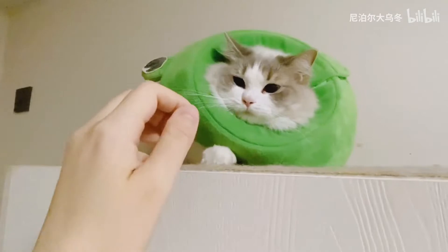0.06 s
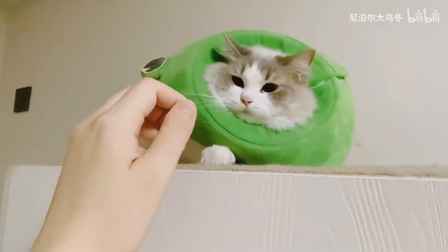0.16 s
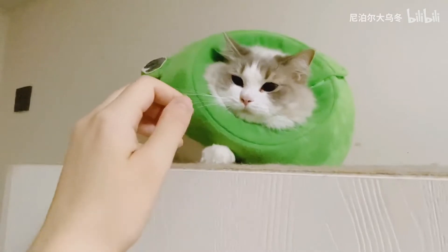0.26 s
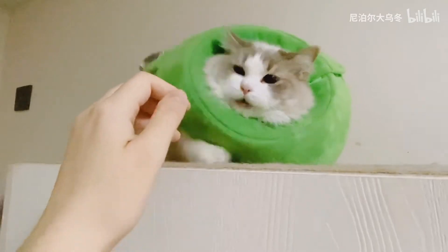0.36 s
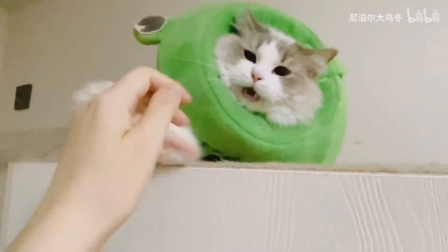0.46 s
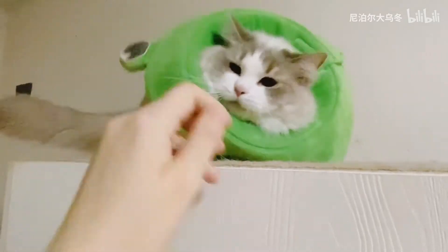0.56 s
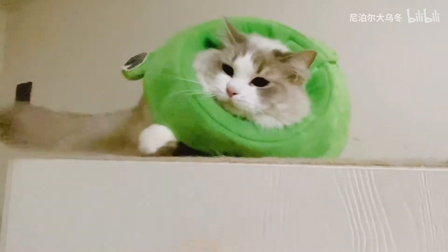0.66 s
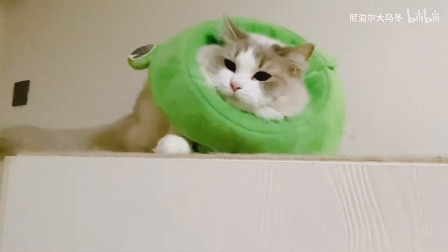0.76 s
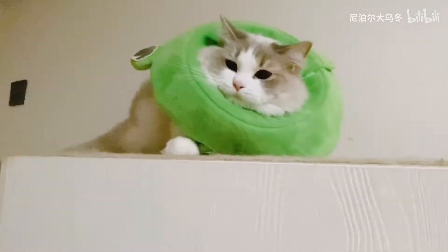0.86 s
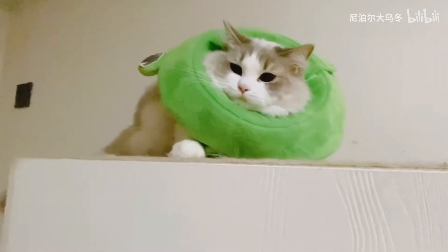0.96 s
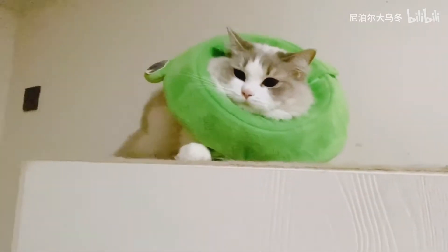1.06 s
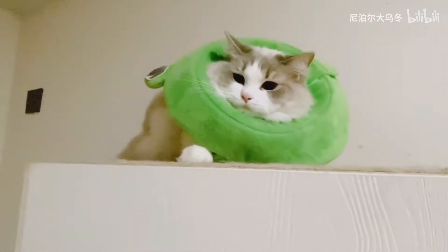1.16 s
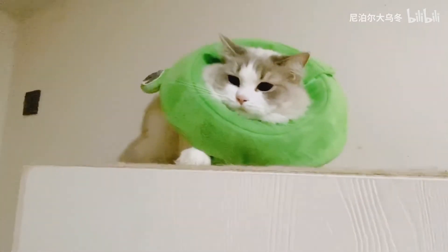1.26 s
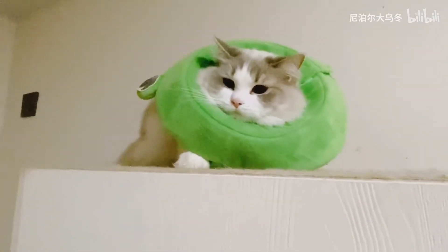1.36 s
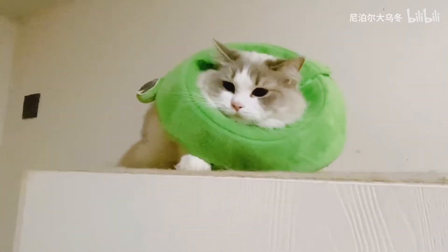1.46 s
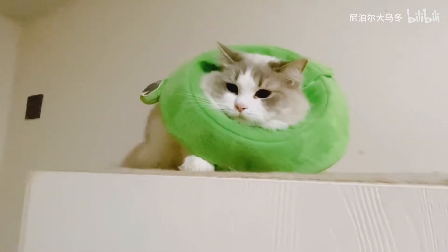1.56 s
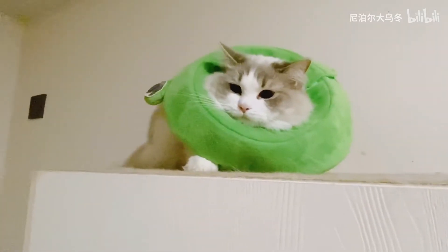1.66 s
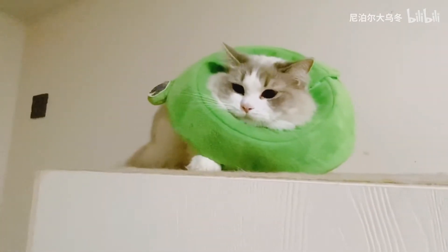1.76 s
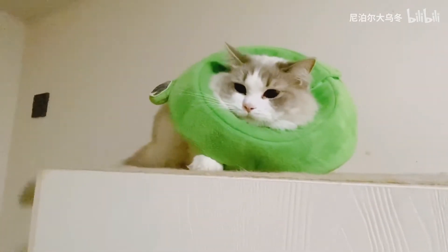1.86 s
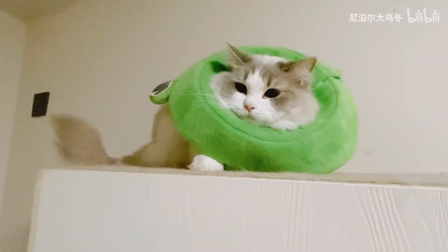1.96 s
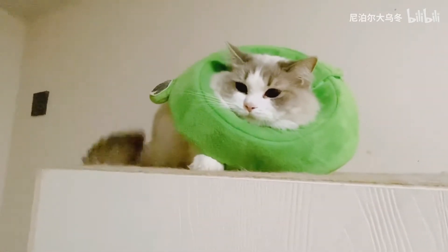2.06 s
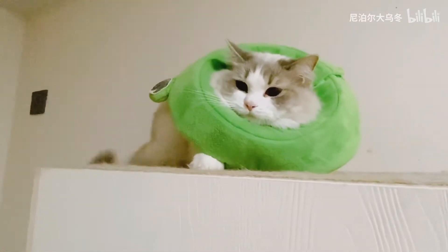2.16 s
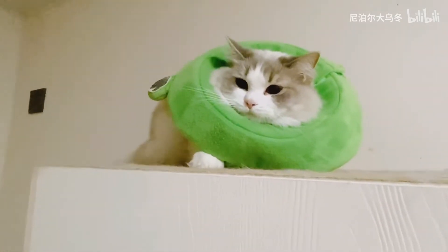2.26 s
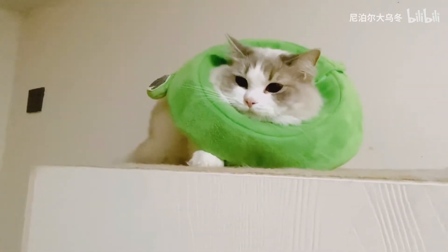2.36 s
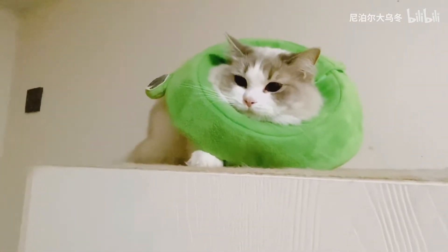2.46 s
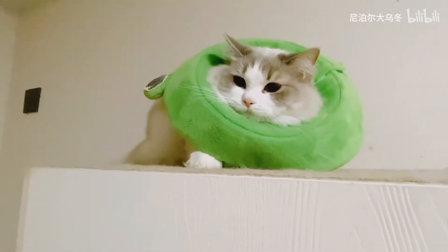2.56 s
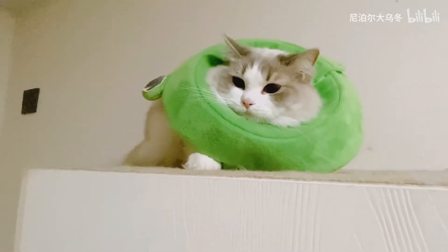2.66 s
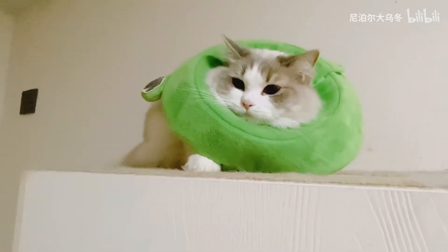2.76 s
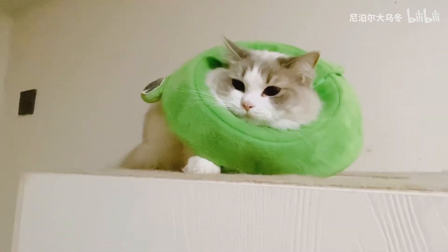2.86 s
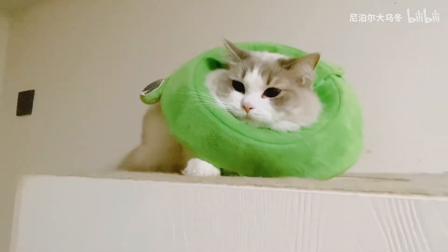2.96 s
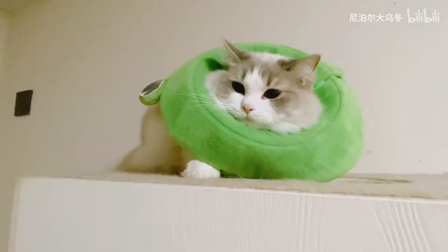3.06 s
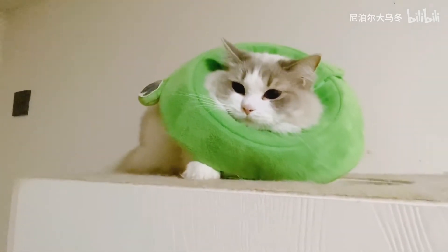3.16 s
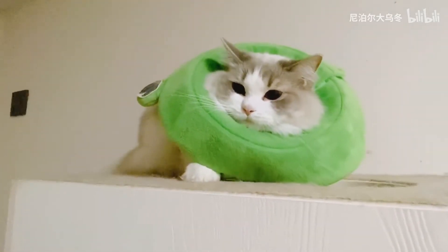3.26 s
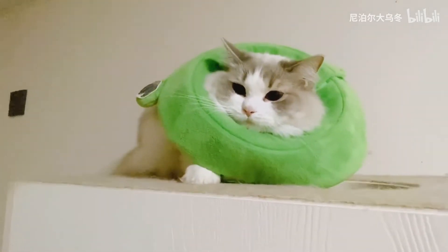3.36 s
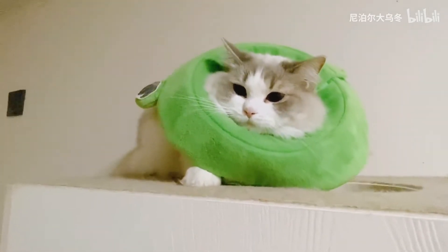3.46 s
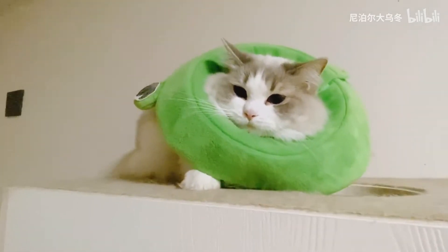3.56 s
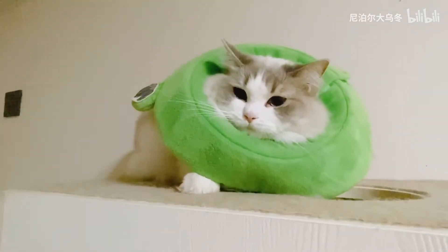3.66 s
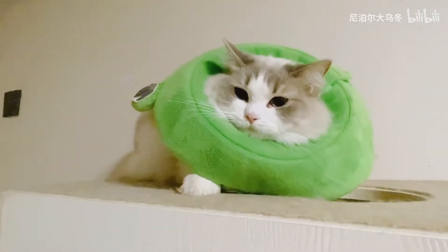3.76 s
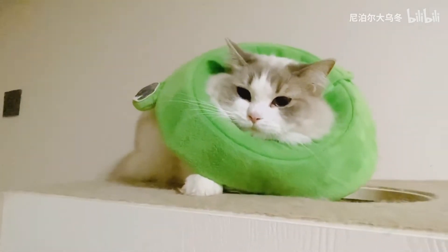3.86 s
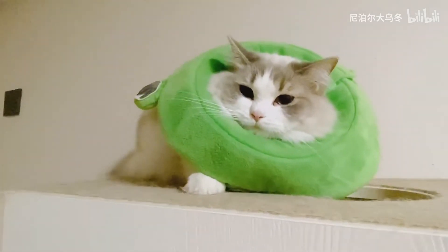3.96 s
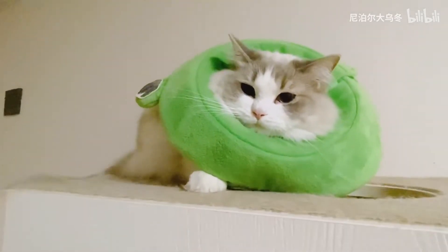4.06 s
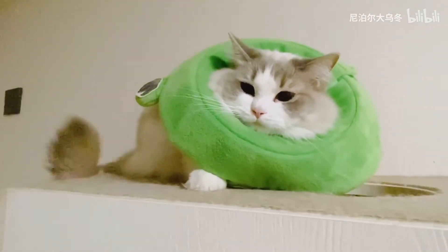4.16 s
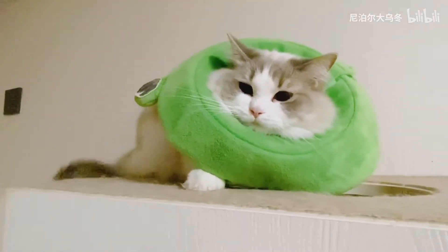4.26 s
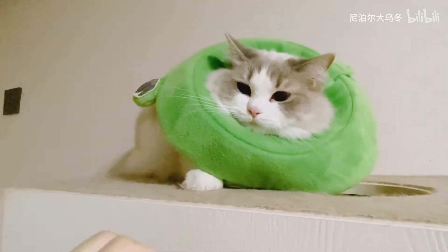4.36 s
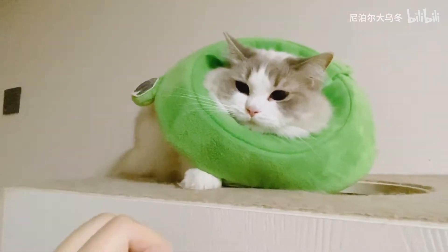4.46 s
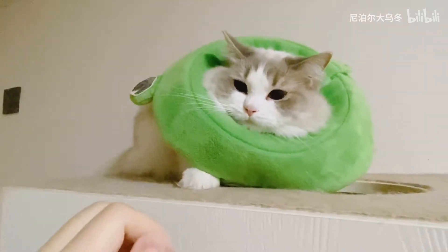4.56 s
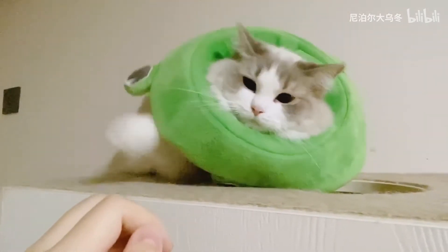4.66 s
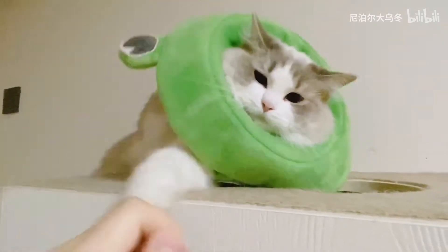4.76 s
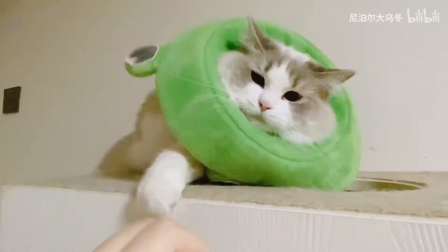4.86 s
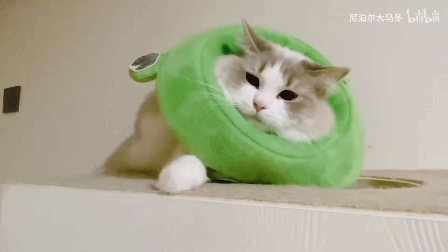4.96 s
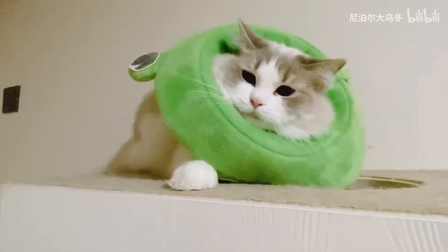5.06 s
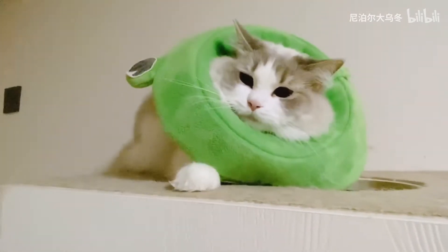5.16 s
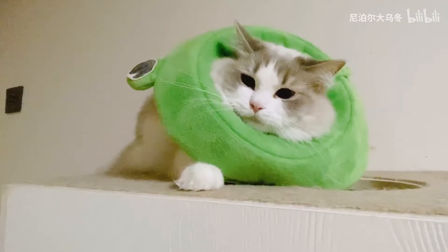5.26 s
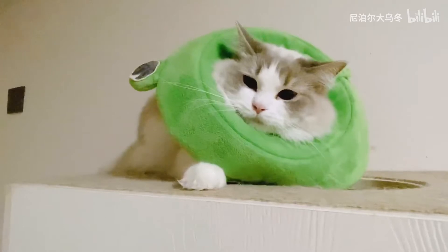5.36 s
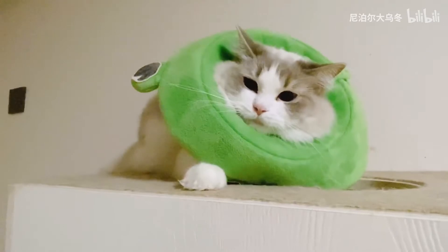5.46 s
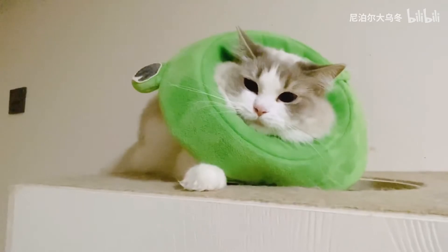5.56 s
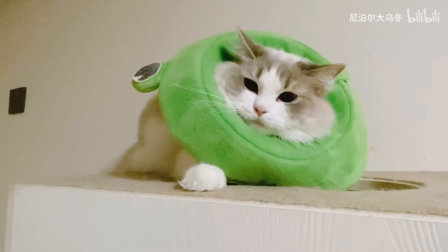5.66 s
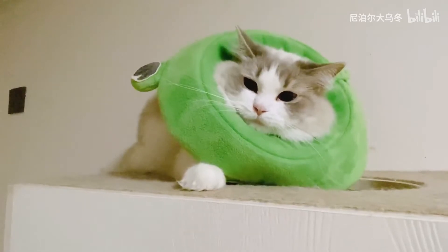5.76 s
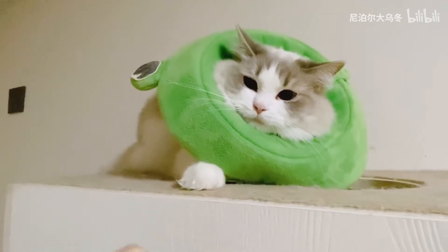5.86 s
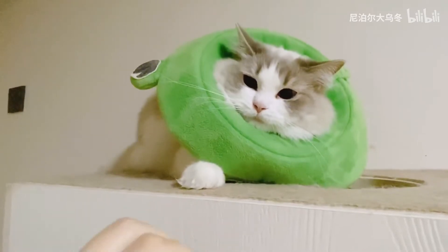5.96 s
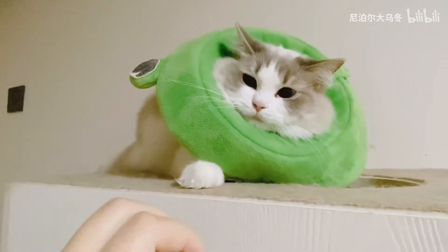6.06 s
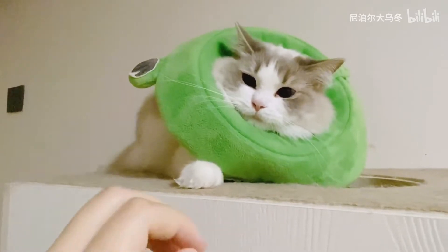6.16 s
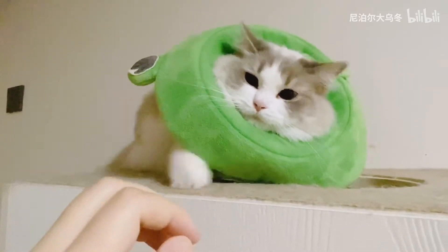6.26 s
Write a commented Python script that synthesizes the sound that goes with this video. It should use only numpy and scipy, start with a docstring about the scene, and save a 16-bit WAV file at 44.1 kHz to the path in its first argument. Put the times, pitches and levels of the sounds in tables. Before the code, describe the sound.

An angry cat close to the microphone in a small room. A very short, piercing screech with spitting air and soft paw thumps comes first, then a faint low grunt and a long closed-mouth moan that rises, holds and sinks into a growl. After a pause, a paw slams the wooden cupboard top and a loud, rasping, wavering yowl follows. Quiet rumble and faint hiss lie beneath.

```python
"""On top of a cupboard in a small room, an angry cat cries close by and swipes at a hand.
It screeches, grunts, then moans through a shut mouth, sinking into a growl; a paw slams on the board
and a louder, rasping yowl follows. The voice is a stack of overtones shaped by throat and jaw, with
hissing air on top. Paw pushes ring the board; claws, fur and faint puffs are short noises. Soft echoes,
a low rumble, a hum that swells twice and a faint hiss lie around it all."""
import sys
import numpy as np
from scipy import signal
from scipy.fft import rfft, irfft
from scipy.io import wavfile

SR = 44100
rng = np.random.default_rng(int(sys.argv[2]) if len(sys.argv) > 2 else 0)


def master(y):
    """Save y as 16-bit WAV."""
    cut = np.clip(np.atleast_2d(y).T, -1, 1)
    pcm = np.round(cut * 32767)  # scale
    wavfile.write(sys.argv[1], SR, pcm.astype(np.int16))


N = 278094
TIME = np.arange(N) / SR   # seconds

# the tune of each cry, before waver and catches: time_s, pitch_hz
SCREECH_PITCH = [(0.394, 745.6), (0.411, 754.6), (0.421, 639), (0.436, 638), (0.458, 761), (0.483, 800),
                 (0.508, 753.5), (0.521, 794), (0.529, 933), (0.54, 946), (0.552, 865), (0.562, 737.6),
                 (0.58, 613.6), (0.612, 617)]
GRUNT_PITCH = [(1.224, 283), (1.255, 233), (1.37, 235)]
MOAN_PITCH = [(1.413, 393), (1.44, 370.4), (1.48, 307), (1.51, 327.3), (1.54, 444), (1.59, 519.5),
              (1.76, 560), (1.83, 618.7), (2.02, 615), (2.2, 584), (2.3, 600.5), (2.55, 542.4),
              (2.645, 511.5), (2.67, 540), (2.705, 537.4), (2.75, 485.4), (2.835, 462), (2.86, 438),
              (3.0, 392), (3.12, 351.3), (3.2, 306.8), (3.266, 254.3), (3.28, 191.2), (3.45, 168.7),
              (3.5, 161.3)]
YOWL_PITCH = [(4.858, 708.5), (4.897, 600), (4.903, 547.4), (4.935, 527), (4.956, 467), (4.994, 569.3),
              (5.042, 603), (5.42, 608), (5.56, 634.4), (5.66, 638), (5.7, 629.7), (5.76, 645.8),
              (5.797, 618.2), (5.806, 550), (5.88, 527.6), (5.915, 559.6), (5.99, 558.8), (6.19, 534.7),
              (6.26, 498.7), (6.305, 333)]
# the screech flares, then is choked as the cat lunges: time_s, effort_db
SCREECH_EFFORT = [(.394, -25), (.413, -14), (.418, -6.5), (.427, -8), (.444, 2.5), (.467, 4), (.492, -7),
                  (.508, -6), (.516, -12), (.54, -11.5), (.563, -17.5), (.578, -26), (.6, -24), (.612, -42)]
# the moan slackens on its upward scoop, presses on at the top, eases before it sinks
# and catches as it drops into the growl: start_s, length_s, fade_s, effort_db
MOAN_STRAINS = [(1.493, 0.32, 0.046, -5), (1.799, 0.43, 0.042, 4), (2.318, 0.26, 0.035, -8),
                (3.244, 0.023, 0.0036, -5.5), (3.269, 0.08, 0.003, 2.5)]
# the yowl bursts out, slackens and is pushed again: time_s, effort_db
YOWL_EFFORT = [(4.855, -12.5), (4.9, -6.5), (4.935, -1), (4.946, -7.5), (4.98, -6.5), (4.998, -6),
               (5.05, -8), (5.16, -4.5), (5.38, -1.5), (5.58, -3.5), (5.78, -6), (5.87, -5), (6.31, -13)]
# the jaw: time_s, opening (0 shut to 1 wide)
JAW = [(.4, 0.43), (.425, 0.43), (.44, 0.76), (.47, 1), (.55, 1), (.62, 0.9), (1.15, 0), (3.6, 0),
       (4.85, 0.89), (4.95, 0.84), (5.02, 0.34), (5.77, 0.59), (5.83, 0.54), (6.31, 0.61)]
# bouts in which the voice breaks into a rasp: start_s, length_s, roughness (0 to 1)
RASPS = [(0.426, .018, .55), (0.44, .04, .16), (0.474, .052, 0.34), (0.57, 0.07, 0.9), (1.2, 0.1, 0.35),
         (1.455, .105, .45), (2.61, 0.25, 0.3), (2.98, .28, .2), (3.266, 0.04, 0.4), (4.935, 0.08, 0.6),
         (5.12, .13, .16), (5.25, 0.25, 0.3), (5.797, 0.76, 0.42), (6.255, .1, .4)]
# the voice catches, so pitch and level drop for an instant: time_s, share_of_pitch_lost
CATCHES = [(2.651, 0.06), (2.75, 0.033), (2.776, .05), (2.803, .06), (2.89, 0.032), (3.02, 0.055),
           (3.142, 0.055), (5.26, 0.095), (5.285, 0.029), (5.314, 0.084), (5.334, 0.036), (5.361, 0.06),
           (5.385, 0.036), (5.402, 0.038), (5.43, 0.072), (5.478, 0.025), (5.671, 0.048), (5.694, 0.071),
           (5.82, 0.026), (5.845, 0.064), (5.946, 0.12), (6.024, 0.068), (6.058, 0.046), (6.076, 0.068),
           (6.109, 0.06), (6.142, 0.039), (6.168, 0.061)]
# the resonances that the two lowest harmonics glide through, mouth shut and open: frequency_hz, gain_db
LOW_SHUT = [(170, -0.5), (195, -4), (245, -4.5), (310, 1.5), (360, -6), (410, 0.5), (535, 1), (590, -6),
            (700, -10.5), (900, -14.5), (1080, -12.5), (1130, -15.5), (1185, -13), (1240, -21.5)]
LOW_OPEN = [(330, -2), (485, 6), (540, 4), (610, 0), (780, -4), (930, 3.5), (1060, 7), (1200, 7.5),
            (1270, 8), (1400, 7.5), (1540, 8.5), (1650, 0.5), (1900, -13)]
# what the throat lets through of the higher overtones, jaw shut, half open and wide: frequency_hz, gain_db
MOUTH_SHUT = [(500, 16), (700, -1.5), (900, -7), (1100, 0), (1380, -5.5), (1600, -20), (2000, -29.5),
              (3000, -63.5), (6000, -84)]
MOUTH_HALF = [(1200, 6), (1480, -1.5), (1650, -7), (1850, -9), (2000, -5.5), (2200, -3), (2400, -9),
              (2570, -0.5), (2800, -2), (3050, -6.5), (3350, -11), (4000, -12.5), (4500, -12),
              (5100, -18.5), (5900, -15.5), (7000, -66)]
MOUTH_WIDE = [(1600, 9), (2000, -5.5), (2350, -2), (2750, -22), (3150, -11.5), (3450, -31), (3850, -3.5),
              (4200, -21.5), (4600, -4.5), (4950, -20), (5300, -5), (5650, -13), (6400, -13.5), (7500, -56)]
# the voice between left and right, before each cry's own pan:
# frequency_hz, left_over_right_db, left_leads_radians
VOICE_PLACE = [(250, 0, .05), (600, -.7, -.2), (1200, -3.5, .2), (1550, -5, .15), (2300, -6.5, 1.3),
               (2900, -4, 2.3), (3900, 0, 2.5), (5400, 0, 4.2)]
# air spat out with the sharpest cries, before its sputter: start_s, length_s, level_db
SPIT = [(0.415, 0.037, -51.5), (0.45, 0.11, -50), (0.545, 0.061, -52), (0.603, 0.06, -70), (4.93, 0.1, -64)]
# colour of the spat air: frequency_hz, gain_db
SPIT_COLOUR = [(400, -5), (900, -4.5), (1500, -7), (2700, 2), (3300, -6), (4000, -24), (6000, -11),
               (8000, -23), (10000, -14.5), (12000, -33), (14500, -12)]
# colour of the air rushing through the yowl: frequency_hz, gain_db
YOWL_AIR = [(2300, -1.5), (3050, -4), (3500, -20), (4400, -9), (4900, 0), (5850, -4.5), (6400, -26)]
# when that air rushes, one row: start_s, length_s, fade_s
YOWL_AIR_BOUT = (4.86, 0.96, 0.054)
# colour of the turbulence in the throat when the yowl rasps: frequency_hz, gain_db
HOARSE_COLOUR = [(1000, -7), (1500, 3.5), (1850, -11), (2200, -1.5), (2700, -6.5), (3050, -13.5),
                 (3400, -24)]
# pushes of the paw on the board: time_s, level_db, contact_s
THUMPS = [(0.481, -45.5, 0.0054), (0.525, -49.5, 0.0024), (0.539, -30.5, 0.013), (0.747, -56.5, 0.0077),
          (4.789, -47, 0.0026), (4.795, -36.5, 0.0035), (4.8031, -35, 0.0062), (4.811, -24.5, 0.0071)]
# the ringing tones of the board: frequency_hz, level_db, time_to_fall_60_db_s
BOARD = [(77.4, -7, 0.36), (130.8, 9, 0.13), (216, -3.5, 0.08), (295, 14, 0.017), (481, -16, 0.043)]
# claws and fur catching the edge, and one low knock at 0.525 s; the peak is set after filtering, before a lean
# to the right: # time_s, peak_db, lowest_hz, highest_hz, decay_s
CLAWS = [(0.509, -29, 1710, 2740, 0.0021), (0.518, -34, 990, 2960, 0.00089),
         (0.5252, -34, 340, 740, 0.0022), (0.576, -35, 800, 3450, 0.0012), (4.784, -59, 3420, 14000, 0.049),
         (4.787, -37, 655, 1580, 0.0012), (4.794, -42, 274, 1280, 0.039),
         (4.946, -30.5, 1180, 2010, 0.00062), (4.9465, -40, 2600, 6260, 0.00093)]
# brief, faint puffs of unclear source, the last a low rumbling swell:
# start_s, length_s, level_db, centre_hz
PUFFS = [(2.336, 0.096, -71.5, 2720), (2.888, 0.09, -71.5, 2600), (2.994, 0.085, -76, 2650),
         (3.131, 0.084, -75, 2160), (3.461, 0.072, -66, 2597), (3.802, 0.071, -69.5, 1060),
         (4.096, 0.077, -69, 1280), (4.21, 0.057, -77, 2900), (4.31, 0.08, -76, 1490),
         (4.656, 0.32, -70.5, 1650), (6.163, 0.2, -57.5, 113)]
# colour of every puff: multiple_of_centre, gain_db
PUFF_COLOUR = [(.6, -16), (.85, -3.5), (1, 7.5), (1.17, -6), (1.7, -17)]
# echoes in the room: frequency_hz, time_to_fall_60_db_s
ROOM_T60 = [(100, .22), (500, .26), (2000, .23), (8000, .18)]
# rise and fall of the background, before the raise set in scene(): time_s, rumble_db, murky_air_db
BACKGROUND = [(0.0, -74, -76.5), (0.37, -68.5, -79), (0.6, -64, -69.5), (1.05, -71, -78),
              (1.49, -65.5, -73), (1.79, -71.5, -74.5), (2.3, -69, -73.5), (2.55, -80, -73.5),
              (3.05, -81, -71), (3.35, -76.5, -73), (3.58, -69, -76.5), (4.2, -87, -89), (4.53, -81, -90.5),
              (4.92, -65.5, -68), (5.5, -72.5, -76), (6.31, -67, -73)]
# colours of the background noises: frequency_hz, gain_db
RUMBLE_COLOUR = [(25, -39), (45, -11), (80, -0.5), (120, -6.5), (170, -16.5), (300, -28)]
AIR_COLOUR = [(100, -26), (170, -9.5), (300, -1.5), (500, -6), (800, -12), (1300, -9.5), (2000, -28),
              (4000, -25.5)]
HISS_COLOUR = [(300, -12.5), (800, 1), (1250, 6.5), (1700, -0.5), (2500, -0.5), (3500, -7), (4500, -4.5),
               (5300, -5.5), (6300, -1), (7400, -4), (8000, -5.5), (9000, -3.5), (10000, -5.5),
               (12000, -22), (14300, -2), (16000, -20)]
# a low hum that swells twice, before its wavering: start_s, length_s, pitch_hz, level_db
HUM = [(1.344, 0.64, 80.6, -63), (3.326, 0.664, 83.5, -64.5)]
# thin, steady whines in the hiss: centre_hz, level_db
WHINES = [(4480, -92.5), (4940, -89.5), (6450, -94), (7480, -92), (9060, -95.5), (10130, -93.5)]
# how alike noise is on the left and right: frequency_hz, correlation (-1 to 1)
LIKENESS = [(60, 1), (200, 0.47), (500, 0.11), (1200, -0.47), (2500, 0.0041), (4500, -0.17), (9000, 0.16)]

# roughness between the bouts of rasp; time to break and to recover, in seconds
CLEAR_ROUGHNESS, RASP_FADE_S = 0.09, 0.0078
# roughness added per share of the pitch lost in a catch
CATCH_ROUGHNESS = 4
# a catch is a bell-shaped dip with this half-width; dB of level for the pitch lost
CATCH_S, CATCH_DB_PER_SHARE = .007, -22
# random share of the pitch: always there, and added at full roughness
WAVER, RASP_WAVER = 0.002, 0.018
# the higher overtones grow as the pitch sinks, as the jaw opens and as the voice roughens
OVERTONE_DB_PER_OCTAVE, OVERTONE_OPEN_DB, OVERTONE_ROUGH_DB = -11.5, 30, 9
MIDDLE_HZ = 500   # the pitch at which the first of these is 0 dB
# shut lips muffle the higher overtones above one pitch; below another the folds slap together in a growl
MUFFLE_HZ, MUFFLE_DB, GROWL_HZ, GROWL_DB, CHANGEOVER_HZ = 476, -8.5, 228, 2, 30
# noisy skirts round the lines of a cry, before they grow by this power of the harmonic number
SCREECH_RASP_DB, MOAN_RASP_DB, YOWL_RASP_DB, SKIRT_GROWTH = -14, -20, -20, 1.3
YOWL_JITTER = 0.3   # radians at full roughness
# time for the spit to start and stop; unevenness of the spat air
SPIT_FADE_S, SPIT_SPUTTER_DB = 0.0072, 2.5
# rushing air at 0 dB effort with the jaw shut; its growth to a jaw wide open
YOWL_AIR_DB, AIR_OPEN_DB = -69.5, 6.5
HOARSE_DB = -49.5   # at 0 dB effort and full roughness
CLAW_SNAP = 3.5   # first touch against the crackle that follows
ROOM_DB = -12   # level of the echoes
HUM_FADE_S, WHINE_WIDTH_HZ = 0.11, 70
LOW_CUT_HZ, CUTOFF_HZ = 46, 15500   # the limits of the finished sound


def cat():
    """Two cries with an open jaw, two lower ones with it shut, and the air that goes with the open ones."""
    screech_db, = in_time(SCREECH_EFFORT)
    screech = call(SCREECH_PITCH, screech_db, first_follows=0.58, level_db=-42.0, overtone_db=-20,
                   jitter=0.76, shimmer=0.44, rasp_db=SCREECH_RASP_DB, pan_db=-1.0)

    grunt_db = swell(GRUNT_PITCH, attack_s=0.025, release_s=0.13, start_db=-41, end_db=-65)
    grunt = call(GRUNT_PITCH, grunt_db, first_follows=0.31, level_db=-42, overtone_db=-25.0,
                 jitter=0.09, shimmer=0.83, rasp_db=-11.5, pan_db=2.0)

    moan_db = swell(MOAN_PITCH, attack_s=0.076, release_s=0.075, start_db=-8.5, end_db=-24.5)
    for start_s, length_s, fade_s, strain_db in MOAN_STRAINS:
        moan_db = moan_db + strain_db * bout(start_s, length_s, fade_s)
    moan = call(MOAN_PITCH, moan_db, first_follows=0.29, level_db=-46.5, overtone_db=-25,
                jitter=0.4, shimmer=0.59, rasp_db=MOAN_RASP_DB, pan_db=1.5, uneven_db=-1.0)

    yowl_db, = in_time(YOWL_EFFORT)
    yowl = call(YOWL_PITCH, yowl_db, first_follows=0.35, level_db=-44.5, overtone_db=-28.0,
                jitter=YOWL_JITTER, shimmer=0.25, rasp_db=YOWL_RASP_DB, pan_db=-0.5, uneven_db=3.0)
    return screech + grunt + moan + yowl + hoarseness(yowl_db) + rushing_air(yowl_db) + spit()


def call(rows, effort_db, first_follows, level_db, overtone_db, jitter, shimmer, rasp_db, pan_db,
         uneven_db=0, ring=4.46, count=14):
    """Harmonics of the vocal folds; effort brightens them, roughness shakes their timing and strength."""
    span = (TIME >= rows[0][0]) & (TIME <= rows[-1][0])
    t = TIME[span]
    out = np.zeros((2, N))
    pitch, = in_time(rows, t)
    effort, rough = effort_db[span], roughness()[span]
    opening = np.clip(in_time(JAW, t)[0], 0, 1)
    caught = catches(t)

    # the fundamental follows only a share of the effort, the overtones all of it
    first_db = first_follows * effort + low_throat(pitch, opening)
    octave_db = effort + low_throat(2 * pitch, opening)
    upper_db = overtone_db + overtone_strength(pitch, effort, opening, rough)

    wobble = (WAVER + RASP_WAVER * rough) * flutter(len(t), 8.93, 24.8)
    pitch = pitch * (1 + wobble - caught)
    phase = 2 * np.pi * np.cumsum(pitch) / SR
    phase = phase + jitter * rough * flutter(len(t), 42.7, 69.7)
    soft_ends = signal.windows.tukey(len(t), 0.0031 * SR / len(t))
    strength = soft_ends * (1 + shimmer * rough * flutter(len(t), 25, 62))
    strength = strength * from_db(CATCH_DB_PER_SHARE * caught)

    # overtones swell and fade as they glide through the throat's resonances
    upper = throat(np.arange(3, count + 1)[:, None] * pitch, opening)
    upper = upper / np.sqrt(np.sum(upper ** 2, axis=0)) * from_db(upper_db)
    # each of them also falters by itself
    upper = [level * from_db(uneven_db * flutter(len(t), 4, 65)) for level in upper]

    for k, level in enumerate([from_db(first_db), from_db(octave_db), *upper], 1):
        hz = k * pitch
        # cycle-to-cycle irregularity spreads a noisy skirt round each line, more so round the high ones
        spread = from_db(rasp_db) * k ** SKIRT_GROWTH * rough
        skirt = spread * (flutter(len(t), 13.0, 190) + 1j * flutter(len(t), 23, 198))
        rough_line = (1 + skirt) / np.sqrt(1 + 2 * spread ** 2)
        # the throat delays each pulse, longest at low frequencies
        lag = ring * np.sqrt(hz / 1000)
        partial = level * strength * rough_line * np.exp(1j * (k * phase - lag))
        out[:, span] += np.real(partial * place_voice(hz, pan_db))
    return np.sqrt(2) * from_db(level_db) * out


def overtone_strength(pitch, effort, opening, rough):
    """Level in dB of the third harmonic and up: lips shut muffle them, a growl lifts them."""
    sinking_db = OVERTONE_DB_PER_OCTAVE * np.log2(pitch / MIDDLE_HZ)
    shut = np.clip(1 - 2 * opening, 0, 1)
    muffled = shut * np.clip((pitch - MUFFLE_HZ) / CHANGEOVER_HZ, 0, 1)
    growling = np.clip((GROWL_HZ - pitch) / CHANGEOVER_HZ, 0, 1)
    mouth_db = OVERTONE_OPEN_DB * opening + OVERTONE_ROUGH_DB * rough
    return effort + sinking_db + mouth_db + MUFFLE_DB * muffled + GROWL_DB * growling


def place_voice(hz, pan_db):
    """Left and right differ in level and timing at each frequency; their joint power stays the same."""
    side_db = at_hz(VOICE_PLACE, hz) + pan_db
    lead = at_hz(VOICE_PLACE, hz, axis=2)
    ears = from_db(np.array([side_db, -side_db]) / 2)
    ears = ears / np.sqrt(np.mean(ears ** 2, axis=0))
    return ears * np.exp(.5j * np.array([lead, -lead]))


def roughness():
    """The voice is nearly clear, except in its bouts of rasp and where it catches."""
    bouts = sum((peak - CLEAR_ROUGHNESS) * bout(s, length, RASP_FADE_S) for s, length, peak in RASPS)
    return np.clip(CLEAR_ROUGHNESS + bouts + CATCH_ROUGHNESS * catches(TIME), 0, 1)


def catches(t):
    """Share of the pitch lost in brief catches of the voice."""
    return sum(share * np.exp(-np.minimum(((t - s) / CATCH_S) ** 2, 20)) for s, share in CATCHES)


def low_throat(hz, opening):
    """Resonance in dB for the two lowest harmonics, blended from mouth shut to open."""
    shut = np.clip(1 - 2 * opening, 0, 1)
    return shut * at_hz(LOW_SHUT, hz) + (1 - shut) * at_hz(LOW_OPEN, hz)


def throat(hz, opening):
    """Gain of throat and mouth; opening the jaw lets the upper resonances out."""
    wide = np.clip(2 * opening - 1, 0, 1)
    shut = np.clip(1 - 2 * opening, 0, 1)
    half = 1.5 - shut - wide   # the half-open curve keeps a share even at the extremes
    return from_db(shut * at_hz(MOUTH_SHUT, hz) + half * at_hz(MOUTH_HALF, hz) + wide * at_hz(MOUTH_WIDE, hz))


def swell(rows, attack_s, release_s, start_db, end_db):
    """Effort of one cry in dB: it rises to full, holds and falls away."""
    attack = np.clip(1 - (TIME - rows[0][0]) / attack_s, 0, 1)
    release = np.clip(1 - (rows[-1][0] - TIME) / release_s, 0, 1)
    return start_db * attack + end_db * release


def hoarseness(effort_db):
    """Where the yowl rasps, turbulent air fills the gaps between its overtones."""
    strength = from_db(HOARSE_DB + .5 * effort_db) * roughness() ** 2
    strength = strength * (TIME > YOWL_PITCH[0][0])
    return strength * stereo_noise(HOARSE_COLOUR) * from_db([[-2.5], [2.5]])   # leans right


def rushing_air(effort_db):
    """Breath noise through the yowl, stronger with effort and a wider jaw."""
    opening, = in_time(JAW)
    strength = from_db(YOWL_AIR_DB + effort_db + AIR_OPEN_DB * opening)
    return strength * bout(*YOWL_AIR_BOUT) * stereo_noise(YOWL_AIR)


def spit():
    """Short bursts of coloured noise whose strength sputters: air forced out of the mouth."""
    strength = sum(from_db(db) * bout(s, length, SPIT_FADE_S) for s, length, db in SPIT)
    sputter = from_db(SPIT_SPUTTER_DB * flutter(N, 43, 160))
    return strength * sputter * stereo_noise(SPIT_COLOUR) * from_db([[-1.5], [1.5]])


def paw():
    """Soft pushes of the pad set the cupboard's top booming in several dying tones."""
    force, out = np.zeros(N), np.zeros(N)
    for s, level_db, contact_s in THUMPS:
        push = np.hanning(max(int(contact_s * SR), 4))
        force[int(s * SR):][:len(push)] += from_db(level_db) * push / push.sum()
    for hz, level_db, t60 in BOARD:
        shrink = from_db(-60 / (t60 * SR))   # loss per sample
        turn = 2 * np.pi * hz / SR           # angle per sample
        top = [1, -shrink * np.cos(turn)]
        bottom = [1, -2 * shrink * np.cos(turn), shrink * shrink]
        out += from_db(level_db) * signal.lfilter(top, bottom, force + 1e-18)
    return out * from_db([[-1.5], [1.5]])


def claws():
    """A claw gives a dry crack, fur a longer scuff, a knock a brief low tick: noise that dies away within a
    band."""
    out, t = np.zeros((2, N)), TIME[:SR // 10]
    for s, peak_db, low_hz, high_hz, decay_s in CLAWS:
        crack = rng.standard_normal((2, len(t))) * np.exp(-t / decay_s)
        crack[0, 0] += CLAW_SNAP   # the first touch is one sharp impulse
        crack = band(band(crack, low_hz, high_hz), low_hz, high_hz)
        crack = crack[0] + .5 * crack[1] * [[1], [-1]]   # middle plus a little width
        out[:, int(s * SR):][:, :len(t)] += from_db(peak_db) * crack / np.abs(crack).max()
    return out * from_db([[-1.2], [1.2]])


def puffs(fade_s=0.027):
    """Brief, faint puffs of noise, source unclear, the last one a low rumbling swell."""
    out = 0
    for s, length, db, hz in PUFFS:
        colour = [(hz * times, gain) for times, gain in PUFF_COLOUR]
        out = out + from_db(db) * bout(s, length, fade_s) * stereo_noise(colour)
    return out


def room(x, first_s):
    """Dense reflections off near walls, a fading noise whose length depends on frequency."""
    t, echo = TIME[:SR // 2], 0
    edges = np.geomspace(60, 15000, 9)
    for low, high in zip(edges, edges[1:]):
        fade = from_db(-60 * t / at_hz(ROOM_T60, np.sqrt(low * high)))
        burst = rng.standard_normal((2, len(t))) * (t > first_s)
        echo = echo + band(burst, low, high) * fade
    echo = echo / np.sqrt(np.sum(echo ** 2, axis=1, keepdims=True))
    return signal.fftconvolve(x, echo, axes=1)[:, :N]


def background(rumble_db, air_db, hiss_db):
    """Low rumble and murky air that rise and fall, a wavering hum, thin whines and an even hiss."""
    low_db, murk_db = in_time(BACKGROUND)
    rumble = from_db(low_db + rumble_db) * stereo_noise(RUMBLE_COLOUR)
    air = from_db(murk_db + air_db) * stereo_noise(AIR_COLOUR)
    hiss = from_db(hiss_db) * stereo_noise(HISS_COLOUR)
    return hum() + whines() + rumble + air + hiss


def hum():
    """Low pure tones that swell and fade while their level wavers."""
    tones = 0
    for s, length, hz, db in HUM:
        tone = rms_one(np.sin(2 * np.pi * hz * TIME))
        tones = tones + from_db(db) * bout(s, length, HUM_FADE_S) * tone
    return tones * from_db(2.7 * flutter(N, 3.0, 41))


def whines():
    """Narrow bands of noise that stand out of the hiss."""
    out, half = 0, WHINE_WIDTH_HZ / 2
    for hz, db in WHINES:
        out = out + from_db(db) * rms_one(band(rng.standard_normal(N), hz - half, hz + half))
    return out


def stereo_noise(colour):
    """Coloured noise, as alike on the left and right as LIKENESS says; rms 1."""
    hz = np.maximum(np.fft.rfftfreq(N, 1 / SR), 1)
    mid, side = rfft(rng.standard_normal((2, N)))
    alike = np.clip(at_hz(LIKENESS, hz), -1, 1)
    both = np.sqrt(1 + alike) * mid + np.sqrt(1 - alike) * side * [[1], [-1]]
    # fade out below the first and above the last frequency of the colour
    ends = np.minimum(1, hz / colour[0][0]) * np.minimum(1, colour[-1][0] / hz) ** 2
    return rms_one(irfft(both * ends * from_db(at_hz(colour, hz)), N))


def flutter(size, low_hz, high_hz):
    """Random wobble between two rates; spread 1."""
    # a run-in of a tenth of a second lets the filter settle
    return rms_one(band(rng.standard_normal(size + SR // 10), low_hz, high_hz)[-size:])


def bout(start_s, length_s, fade_s):
    """Fade in, hold at 1, fade out."""
    return np.clip(np.minimum(TIME - start_s, start_s + length_s - TIME) / fade_s, 0, 1)


def band(x, low_hz, high_hz):
    """Keep what lies between two frequencies (Butterworth band-pass)."""
    edges = [low_hz, min(high_hz, .49 * SR)]
    return signal.sosfilt(signal.butter(2, edges, "band", fs=SR, output="sos"), x)


def in_time(rows, t=TIME):
    """The columns of a curve at the times t."""
    s, *columns = np.transpose(rows)
    return [np.interp(t, s, c) for c in columns]


def at_hz(points, hz, axis=1):
    """One column of a table, read on a log-frequency axis."""
    table = np.array(points)
    return np.interp(np.log(hz), np.log(table[:, 0]), table[:, axis])


def from_db(db):
    """Decibels to gain."""
    return 10 ** (np.asarray(db) / 20)


def rms_one(x):
    """Scale to an rms (average strength) of 1."""
    return x / np.sqrt(np.mean(x ** 2) + 1e-20)


def scene():
    """The cat, its blows and the faint puffs, their reflections, and the background."""
    near = cat() + paw() + claws() + puffs()
    echoes = from_db(ROOM_DB) * room(near, first_s=0.011)
    return near + echoes + background(rumble_db=6.0, air_db=7.0, hiss_db=-72.5)


def record(dry):
    """The deepest bass is rolled off and the top is cut steeply."""
    dry = signal.sosfilt(signal.butter(2, LOW_CUT_HZ, "high", fs=SR, output="sos"), dry)
    return signal.sosfilt(signal.ellip(10, .1, 80, CUTOFF_HZ, fs=SR, output="sos"), dry)


dry = scene()
out = record(dry)
master(out)
```